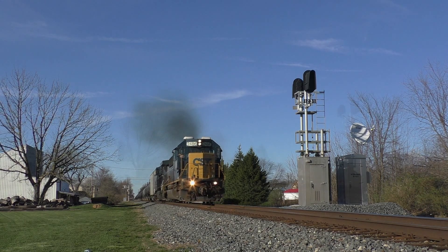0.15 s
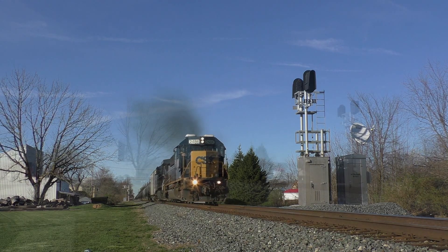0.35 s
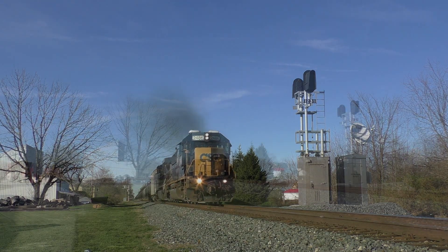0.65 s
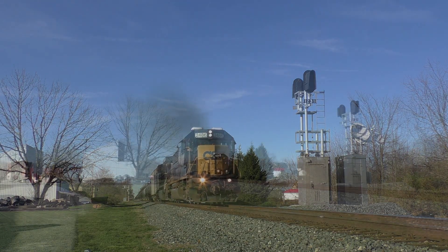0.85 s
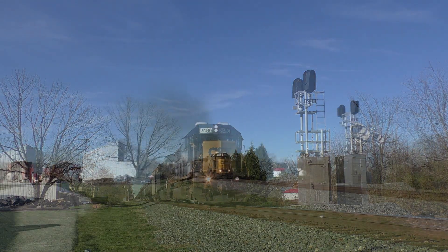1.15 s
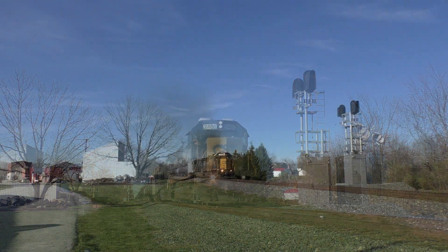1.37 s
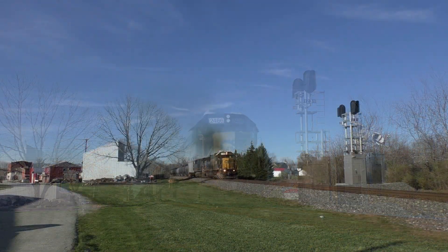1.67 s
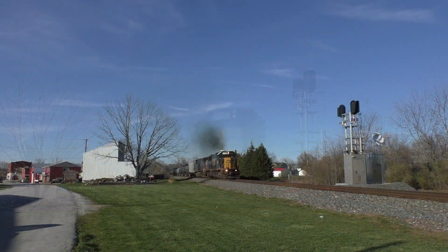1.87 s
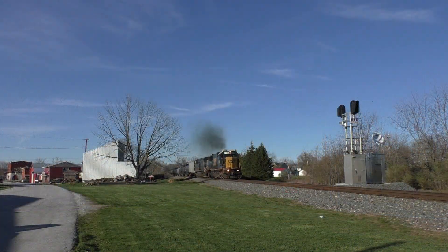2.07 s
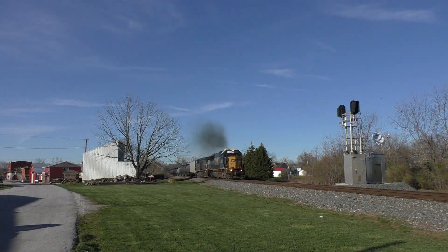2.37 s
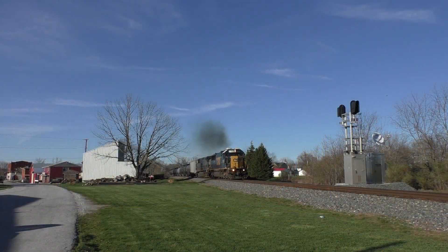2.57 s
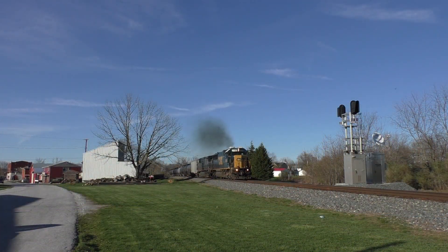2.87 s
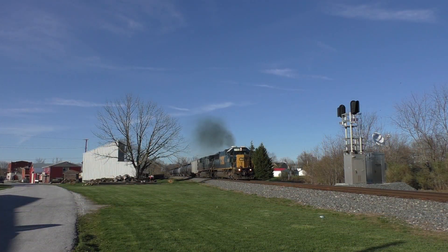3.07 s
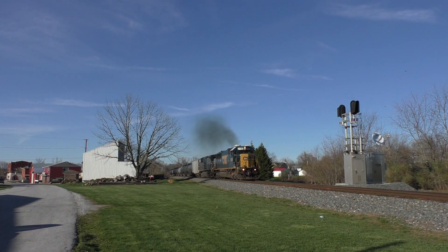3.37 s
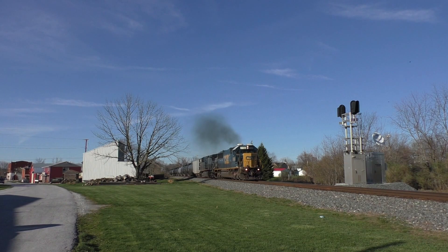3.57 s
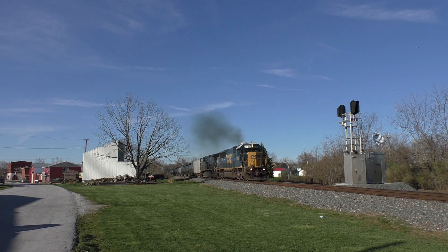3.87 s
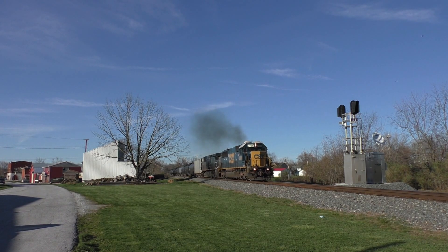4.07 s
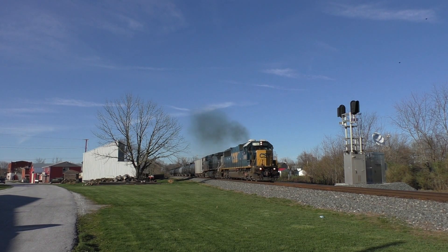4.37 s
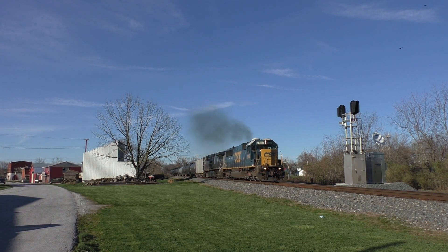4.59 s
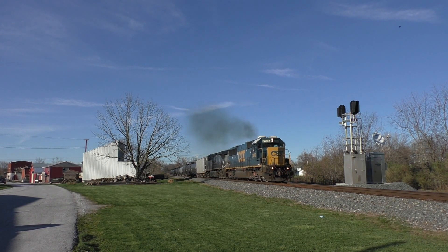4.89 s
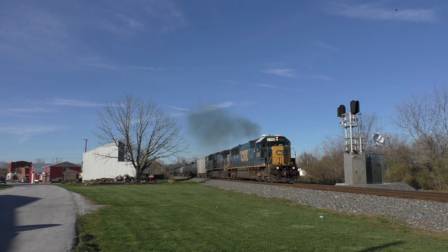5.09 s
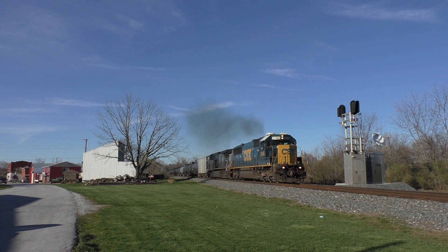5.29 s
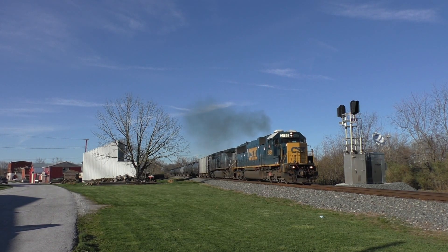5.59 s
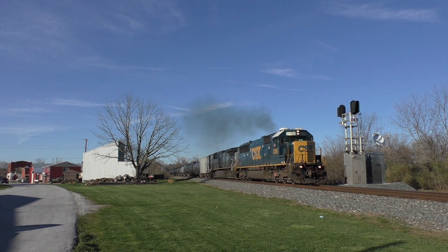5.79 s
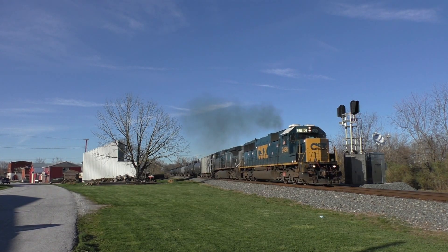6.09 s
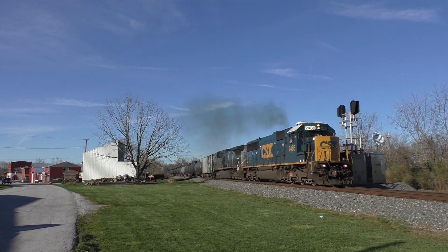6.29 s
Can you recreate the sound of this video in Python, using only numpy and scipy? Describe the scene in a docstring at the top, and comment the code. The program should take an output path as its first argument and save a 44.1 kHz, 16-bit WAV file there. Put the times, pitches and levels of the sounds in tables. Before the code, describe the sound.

Two diesel locomotives chug and rumble closer at full power, with wheels hissing and rails ringing and ticking ever louder.

```python
"""Beside a railway track, two diesel locomotives at full power haul a tank train closer.
Their exhaust notes chug and beat against each other over a rumble and the roar of stacks and fans.
The rails sing ahead of the wheels, with gritty hiss and small steel ticks, louder as the train nears.
A wide stereo sound close to the ballast crossfades early into a mono one from a lawn."""
import sys
import numpy as np
from scipy import signal
from scipy.fft import rfft, irfft
from scipy.io import wavfile

SR = 44100
rng = np.random.default_rng(int(sys.argv[2]) if len(sys.argv) > 2 else 0)


def transcribe(u):
    """Save the signal u as a 16-bit wav file named by the first command-line argument.

    u: samples, shape (n,) or (channels, n), limited to [-1, 1]; the rate is SR.
    q: integer samples, one column per channel.
    """
    v = np.clip(np.atleast_2d(u).T, -1, 1)
    q = np.round(v * 32767).astype(np.int16)
    wavfile.write(sys.argv[1], SR, q)


N = 284004
TIME = np.arange(N) / SR

# train loudness, dipping in the opening crossfade and swelling near 3.5 s: (time [s], level [dB])
TRAIN_LEVEL = [(0, 4), (.6, -2.5), (.95, -4.5), (1.5, -3), (2.6, 0), (3.45, 3), (4.3, 0), (6.44, 0.5)]
# wheel flange rubs: (time [s], half length [s], rise [dB], pitch [Hz])
FLANGE_RUBS = [(1.75, .45, .8, 3080), (2.63, .07, 4.4, 3020), (3.23, .04, 2.6, 3100),
               (3.85, .08, 1.3, 3130), (4.28, .06, 2.4, 3120), (4.44, .1, 1.8, 3030), (5.2, .21, 1, 3110),
               (5.56, .06, 1.2, 3100), (5.78, .03, 2, 3060), (5.92, .05, 2, 2960)]


def gain_of(db):
    """Decibels to amplitude."""
    return 10 ** (np.asarray(db) / 20)


def unit_rms(x):
    """Scales to an rms of one."""
    return x / np.sqrt(np.mean(x ** 2) + 1e-20)


def curve(rows, column=1):
    """One column of a time table at every sample."""
    columns = np.transpose(rows)
    return np.interp(TIME, columns[0], columns[column])


def at_hz(rows, hz):
    """Interpolates a spectrum table over log frequency."""
    row_hz, value = np.transpose(rows)
    return np.interp(np.log(hz + 1), np.log(row_hz + 1), value)


def swells_db(rows):
    """Sum of bell-shaped level changes."""
    return sum(db * np.exp(-((TIME - s) / half_s) ** 2) for s, half_s, db, *_ in rows)


def drift(cutoff_hz):
    """Smooth random wander of unit size."""
    control_hz = 400
    hz = np.fft.rfftfreq(4096, 1 / control_hz)
    slow = irfft(rfft(rng.standard_normal(4096)) / np.sqrt(1 + (hz / cutoff_hz) ** 6))
    return np.interp(TIME * control_hz, np.arange(len(slow)), unit_rms(slow))


def noise():
    """White noise."""
    return rng.standard_normal(N)


def shaped(x, spectrum):
    """Filters by a spectrum table, rolling off above its last row; unit rms."""
    hz = np.fft.rfftfreq(N, 1 / SR)
    above = np.maximum(hz / spectrum[-1][0], 1)
    return unit_rms(irfft(rfft(x) * gain_of(at_hz(spectrum, hz)) / above ** 4, N))


def approach_db(db, growth, level_share=0, before_joint_db=0):
    """Level of a nearing source; growth is the exponent of 1 / distance."""
    speed_m_s, passes_at_s, offset_m, reference_m = 19.9, 8.92, 30, 46.8
    joint_s, joint_rise_s = 2.67, 0.13  # the front wheels cross onto the near rails
    distance_m = np.hypot(offset_m, speed_m_s * (passes_at_s - TIME))
    nearing_db = growth * 20 * np.log10(reference_m / distance_m)
    far_rails = .5 - .5 * np.tanh((TIME - joint_s) / joint_rise_s)
    return db + nearing_db + level_share * curve(TRAIN_LEVEL) + before_joint_db * far_rails


def engine(cycles, steady_orders, swelling_orders, wide, wander_rad, smear, centre_order, split_cycles):
    """Uneven cylinders sound multiples of the cycle; moving air and ground echo make each waver."""
    # echoes jumble the orders while the train is far: (time [s], phase scatter [cycles])
    echo_scatter = [(2.2, .65), (3.8, .22)]
    # the low throb sinks, then fills out: (time [s], half length [s], rise [dB])
    throb = [(.2, 0.26, 5), (.88, 0.31, -8.5), (1.42, 0.3, 1)]
    deep_below_hz, throb_below_hz = 78, 130
    cycle_hz = cycles[-1] / TIME[-1]

    def order(k):
        k = round(k)
        phase = k * cycles + smear * (k - centre_order) ** 2  # the pipe smears the chug
        phase += split_cycles * (k % 2)  # shares the chug between the half cycles
        phase += curve(echo_scatter) * (rng.random() - .5)
        return np.sqrt(2) * np.cos(2 * np.pi * phase + wander_rad * drift(0.86))

    steady, swelling = np.zeros((2, N))
    for k, db in steady_orders:
        train_db = curve(TRAIN_LEVEL) * np.clip(k * cycle_hz / 130, .9, 1.7)  # high orders vary more
        deep_db = approach_db(-2.5, growth=-0.26) * (k * cycle_hz < deep_below_hz)
        steady += gain_of(db + train_db + deep_db + 1.2 * drift(0.41)) * order(k)
    for k, db, depth_db, crest_s, period_s, wide_db in swelling_orders:
        wave_db = depth_db * np.cos(2 * np.pi * (TIME - crest_s) / period_s)
        throb_db = swells_db(throb) * (k * cycle_hz < throb_below_hz)
        swelling += gain_of(db + wave_db + wide_db * wide + throb_db) * order(k)
    return gain_of(-7.3 * wide) * steady + swelling


def lead_exhaust(turns, wide):
    """Leading two-stroke: one chug per crankshaft turn."""
    # steadier tones: (order, level [dB])
    steady = [(3, -52), (4, -37), (5, -36.5), (6, -34), (14, -44), (16, -50.5), (17, -45.5), (24, -47),
              (27, -56), (33, -49)]
    # swelling tones: (order, mean [dB], depth [dB], crest [s], period [s], gain when wide [dB])
    swelling = [(8, -24, 5, 3.55, 2.9, -15), (9, -32, 6, 4.6, 4.2, -11), (10, -22.4, 2.6, 4.54, 2.5, 2),
                (11, -30.5, 3, 2.6, 5.2, -2)]
    return engine(turns, steady, swelling, wide,
                  wander_rad=.08, smear=-.017, centre_order=7.5, split_cycles=0)


def trail_exhaust(cycles, wide):
    """Trailing four-stroke: a hard and a soft beat per cycle."""
    # steadier tones: (order, level [dB])
    steady = [(4, -47), (5, -41), (7, -35), (9, -34), (14, -32.5), (15, -39), (19, -38), (20, -35.5),
              (24, -41.5), (25, -46.5), (26, -37.5), (27, -41.5), (54, -48.5), (81, -48.5)]
    # swelling tones: (order, mean [dB], depth [dB], crest [s], period [s], gain when wide [dB])
    swelling = [(8, -27.5, 4, 2.3, 7, -8), (10, -30, 4.5, 3.4, 5.4, -10), (11, -26.5, 4, 2, 4.4, 1.5),
                (12, -25.5, 3.5, 4.3, 8, -11), (13, -30, 4.5, 2.7, 4.8, -3),
                (16, -29.5, 8.5, 5.5, 5.5, -15.5), (18, -41.5, 8, 6, 6.5, -17)]
    return engine(cycles, steady, swelling, wide,
                  wander_rad=.1, smear=.007, centre_order=14.5, split_cycles=-.155)


def rumble(wide):
    """Deep exhaust noise, thinning a little as the train nears."""
    # rumble spectrum: (frequency [Hz], level [dB])
    spectrum = [(15, -33), (30, -14), (50, -2.5), (65, 0), (110, 6.5), (165, 0), (200, -1), (260, -5.5),
                (330, -15), (600, -62)]
    level_db = approach_db(-26.7, growth=-0.38, level_share=0.6) - 6.5 * wide
    return gain_of(level_db) * shaped(noise(), spectrum)


def trackside_rush():
    """Steady rush of fans and wheels, heard close to the ballast."""
    # rush spectrum: (frequency [Hz], level [dB])
    spectrum = [(150, -26), (215, -9), (265, -4.5), (335, -2), (430, -10), (600, -9), (800, -12),
                (1200, -16), (2100, -21.5), (3100, -23), (4400, -26), (6500, -35.5), (9000, -42),
                (11500, -47.5), (13100, -44), (14200, -63)]
    return gain_of(-27.0) * shaped(noise(), spectrum)


def spaced_pair(x, lag_s):
    """Stereo: the right side hears the train later, shaded, and partly by scattered paths."""
    # left-right likeness before clipping: (frequency [Hz], likeness [ratio])
    likeness = [(100, 1.3), (300, 0.65), (700, 0.72), (1400, 0.37), (3000, 0.18), (5000, 0.27), (7500, 1.6),
                (10000, 0.6)]
    # balance: (frequency [Hz], left minus right [dB])
    balance = [(200, 0.5), (380, 1.5), (700, 4.5), (1300, 9.5), (2400, 8), (4400, 3.5), (8000, -0.5)]
    hz = np.fft.rfftfreq(N, 1 / SR)
    coherence = np.clip(at_hz(likeness, hz), 0, .97)
    lean = gain_of(at_hz(balance, hz) / 2)
    paths = noise() * np.exp(-TIME / 0.046)
    scattered = np.exp(1j * np.angle(rfft(paths)))
    delayed = np.exp(-2j * np.pi * np.minimum(hz * lag_s, 1))  # the finest hiss stays centred
    right = coherence * delayed + np.sqrt(1 - coherence ** 2) * scattered
    low_cut = hz ** 2 / np.hypot(hz ** 2, 42 ** 2)  # 42 Hz corner
    return irfft(rfft(x) * low_cut * np.array([lean, right / lean]), N)


def stack_roar(lead_turns, trail_cycles):
    """Turbulent gas roars and puffs a little with the firing."""
    # roar spectrum: (frequency [Hz], level [dB])
    spectrum = [(130, -3.5), (260, -3), (360, 2), (450, 0), (570, 1), (720, -3.5), (900, -12),
                (1150, -21.5), (1600, -51), (2600, -41.5), (6000, -54)]
    # brief surges: (time [s], half length [s], rise [dB])
    surges = [(1.45, 0.23, 2), (4.75, 0.61, 1.1), (5.38, 0.15, 2), (6.02, 0.13, 3)]
    puffs = 1 + .09 * np.cos(2 * np.pi * 8 * lead_turns) + .07 * np.cos(2 * np.pi * 6 * trail_cycles)
    level_db = approach_db(-25.5, growth=0.67, level_share=0.48) + swells_db(surges)
    return shaped(noise(), spectrum) * puffs * gain_of(level_db)


def gear_whine():
    """Faint, rough tones of gears and blowers."""
    # whines: (frequency [Hz], relative level [dB])
    tones = [(555, -10), (698, -17), (727, -17), (845, -17), (1111, -21), (1721, -27)]
    whine = np.zeros(N)
    for hz, db in tones:
        cycles = np.cumsum(hz + 2 * drift(18)) / SR
        whine += gain_of(db + 2 * drift(6)) * np.sin(2 * np.pi * cycles)
    return whine * gain_of(approach_db(-27.5, growth=0.16, level_share=0.69))


def grit(per_s, spread_db):
    """Tiny impacts of uneven size, each a burst of about a millisecond."""
    sizes = gain_of(spread_db * np.minimum(rng.exponential(1, N), 4))
    impacts = sizes * (rng.random(N) < per_s / SR)
    power = signal.lfilter([1], [1, -np.exp(-1 / (0.0012 * SR))], impacts ** 2)
    return unit_rms(noise() * np.sqrt(power))


def wheels(trail_cycles):
    """Rough steel rolls on steel: rails ring near 3 kHz under a hiss that flutters with the engine."""
    # spectra of rolling, rail ring, hiss and finest hiss: (frequency [Hz], level [dB])
    rolling_spectrum = [(400, -22), (800, 3.5), (1100, 4), (1500, -1), (2000, -1.5), (2500, -4.5),
                        (3200, -5), (4000, -5.5), (5000, -15), (8000, -44)]
    rail_spectrum = [(1500, -13), (2500, -9), (2850, -5.5), (3100, -5.5), (3300, -5), (3550, -6.5),
                     (3900, -14.5), (5000, -32.5), (8000, -46)]
    hiss_spectrum = [(2000, -50), (3500, -3.5), (4400, 1), (5300, -1), (6200, -2.5), (7000, -7.5),
                     (8400, -16), (10000, -22.5), (13000, -46.5)]
    fizz_spectrum = [(5000, -7.5), (8000, 5), (10000, -3.5), (12000, -4), (13100, -1), (14000, -11),
                     (15500, -28.5)]
    # flares of the finest hiss: (time [s], half length [s], rise [dB])
    flares = [(3.95, 0.62, 4.5), (5.33, 0.066, 3.5)]
    flutter_db = drift(24) + .6 * np.cos(2 * np.pi * 3 * trail_cycles)
    rub_db, flare_db = swells_db(FLANGE_RUBS), swells_db(flares)

    rolling_db = approach_db(-31.0, growth=0.36, level_share=0.72, before_joint_db=0.7)
    rolling = shaped(noise() + .2 * grit(500, 1.6), rolling_spectrum)
    rolling *= gain_of(rolling_db + .45 * flutter_db)

    rail_db = approach_db(-30.0, growth=0.6, before_joint_db=-5.5)
    rails = shaped(noise() + .5 * grit(280, 3.0), rail_spectrum)
    rails *= gain_of(rail_db + rub_db + .7 * flutter_db + .7 * drift(9))
    squeal_db = approach_db(-40.3, growth=.45, before_joint_db=-3.3)
    squeal = rail_squeal() * gain_of(squeal_db + 1.5 * rub_db + flutter_db)

    hiss = shaped(noise() + .5 * grit(500, 3.5), hiss_spectrum)
    fizz = shaped(noise() + .5 * grit(400, 3), fizz_spectrum)
    hiss_db = approach_db(-37.5, growth=0.9, level_share=0.14, before_joint_db=-4.0)
    fizz_db = approach_db(-46.0, growth=2.25, before_joint_db=2.0)  # air absorbs it, so it grows fastest
    hiss *= gain_of(hiss_db + .4 * flare_db + .44 * rub_db + .73 * flutter_db + .55 * drift(13))
    fizz *= gain_of(fizz_db + flare_db + .4 * rub_db + .5 * flutter_db + drift(8))
    return rolling + rails + squeal + hiss + fizz


def rail_squeal(width_hz=270, wander_hz=30):
    """The sharpest rail resonance: a narrow band that moves to the pitch of each rub."""
    hz = curve(FLANGE_RUBS, column=3) + wander_hz * drift(7.13)
    b, a = signal.butter(2, width_hz / 2, fs=SR)
    baseband = signal.lfilter(b, a, noise() + 1j * noise())
    carrier = np.exp(2j * np.pi * np.cumsum(hz) / SR)
    return unit_rms((baseband * carrier).real)


def track_ticks(rise_s=0.00045, decay_s=0.0027):
    """The track takes up the load with short snaps."""
    # steel ticks: (time [s], peak [dB], pitch [Hz], width [octaves])
    ticks = [(2.661, -35, 6000, .6), (2.674, -21, 4500, .42), (3.583, -36, 5500, .55),
             (3.993, -14, 2600, .95), (4.006, -22, 4900, .45), (4.031, -34, 5800, .5),
             (4.145, -35, 5800, .55), (4.702, -33.5, 6100, .6), (4.93, -37, 6000, .6),
             (5.262, -32, 5000, .6), (5.379, -33, 5900, .55), (5.855, -31, 5000, .6),
             (6.18, -31, 6000, .55), (6.23, -30, 5500, .55)]
    out, t = np.zeros(N), np.arange(2048) / SR
    hz = np.fft.rfftfreq(len(t), 1 / SR)
    for start_s, peak_db, pitch_hz, octaves in ticks:
        band = np.exp(-(np.log2((hz + 1) / pitch_hz) / octaves) ** 2)
        ring = irfft(rfft(rng.standard_normal(len(t))) * band)
        snap = ring * (1 - np.exp(-t / rise_s)) * np.exp(-t / decay_s)
        start = round(start_s * SR)
        out[start:start + len(t)] += gain_of(peak_db) * snap / abs(snap).max()
    return out


def scene():
    """The exhaust booms throughout while the wide trackside sound fades into that of the lawn."""
    # trailing engine speed: (time [s], cycle rate [Hz])
    trail_speed = [(0, 8.93), (4.3, 8.937), (6.44, 8.885)]
    lead_hz, first_chug_s, first_beat_s = 15.235, .0395, .0705
    crossfade_s = [0.026, 1.774]
    lead_turns = lead_hz * (TIME - first_chug_s)
    trail_cycles = np.cumsum(curve(trail_speed)) / SR - first_beat_s * trail_speed[0][1]
    wide = np.interp(TIME, crossfade_s, [1, 0])
    exhaust = lead_exhaust(lead_turns, wide) + trail_exhaust(trail_cycles, wide) + rumble(wide)
    trackside = spaced_pair(exhaust + trackside_rush(), lag_s=0.00033)
    lawn = exhaust + stack_roar(lead_turns, trail_cycles) + gear_whine()
    lawn += wheels(trail_cycles) + track_ticks()
    return wide * trackside + (1 - wide) * lawn


def record(dry):
    """Steep low-pass at 15.75 kHz."""
    taps = signal.firwin(511, 15750, window=("kaiser", 9), fs=SR)
    return signal.oaconvolve(dry, taps[None], "same")


dry = scene()
out = record(dry)
transcribe(out)
```